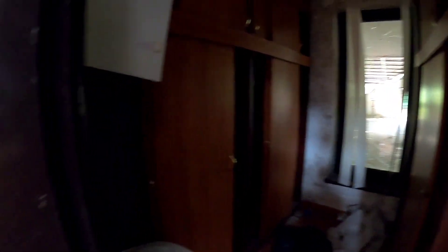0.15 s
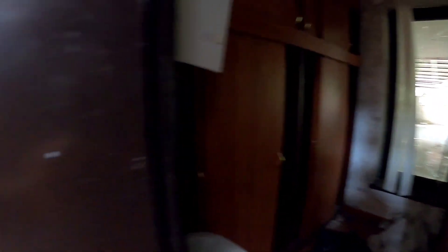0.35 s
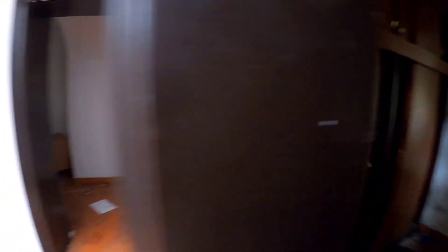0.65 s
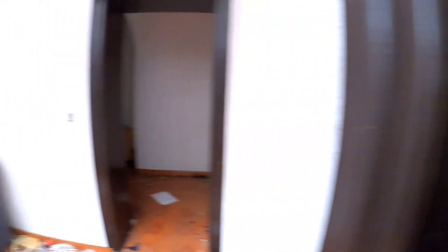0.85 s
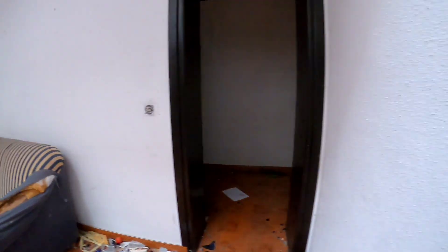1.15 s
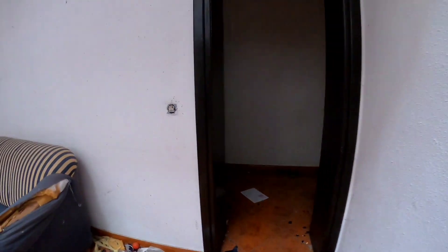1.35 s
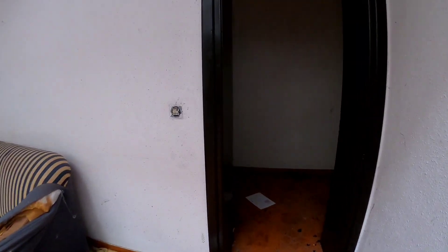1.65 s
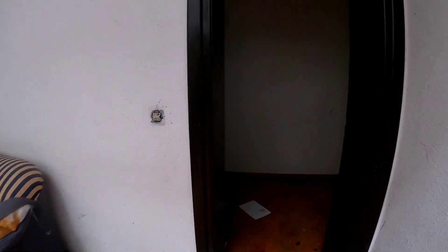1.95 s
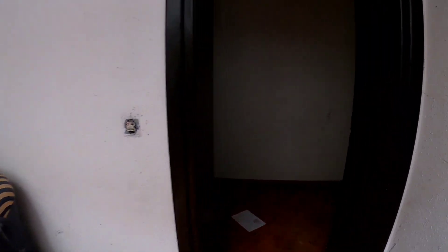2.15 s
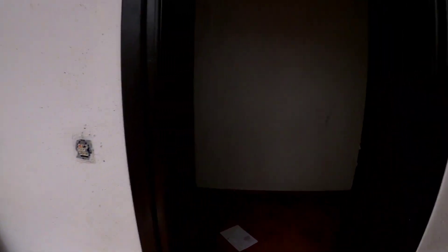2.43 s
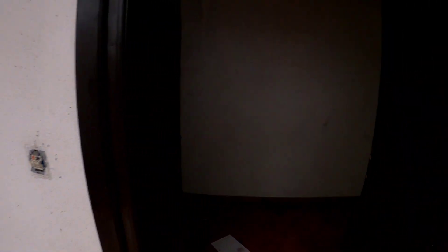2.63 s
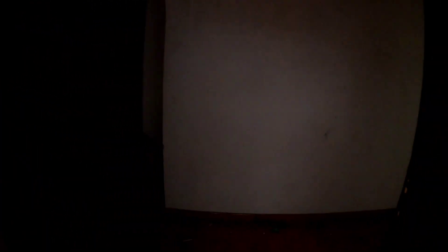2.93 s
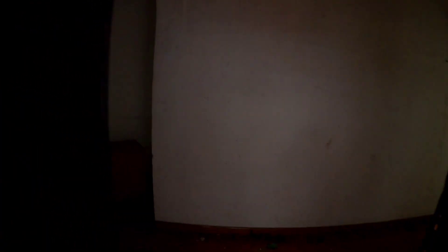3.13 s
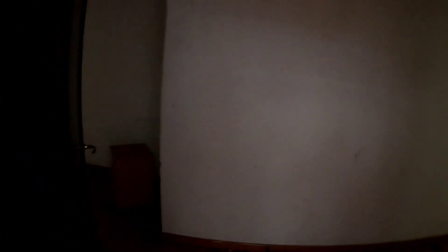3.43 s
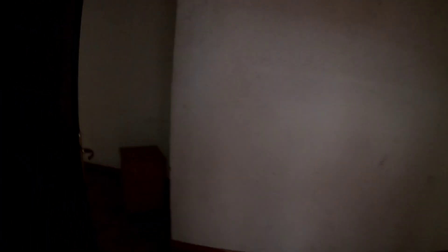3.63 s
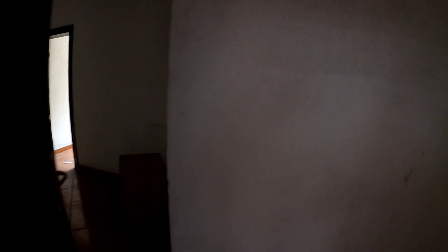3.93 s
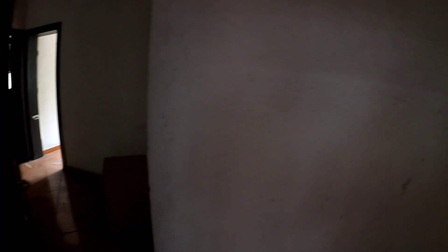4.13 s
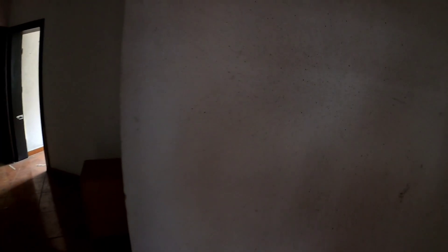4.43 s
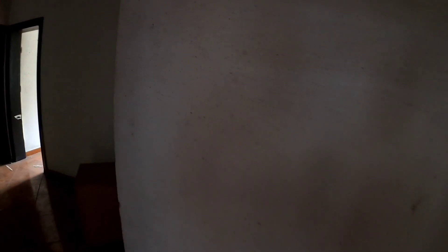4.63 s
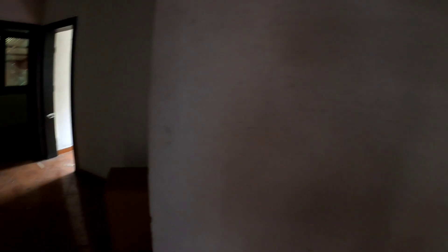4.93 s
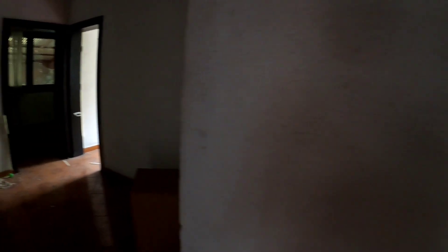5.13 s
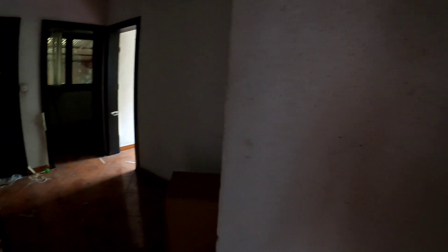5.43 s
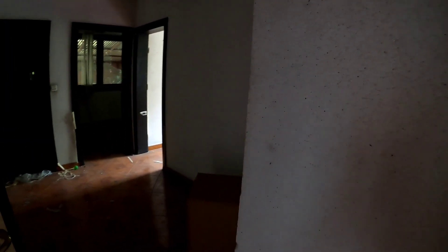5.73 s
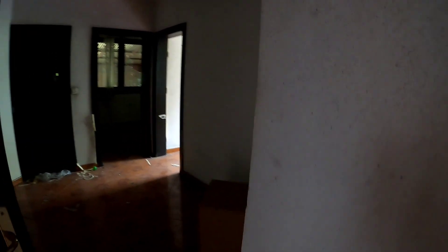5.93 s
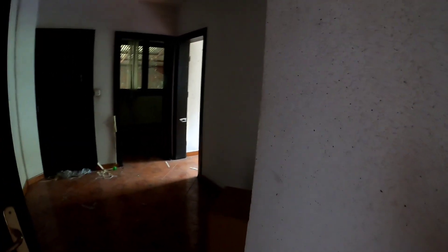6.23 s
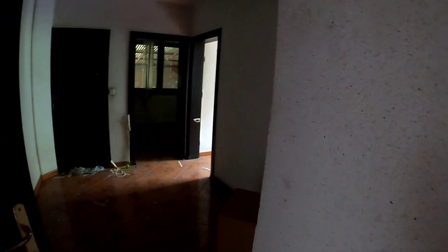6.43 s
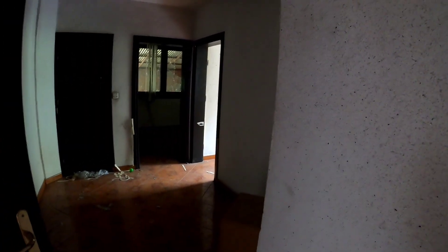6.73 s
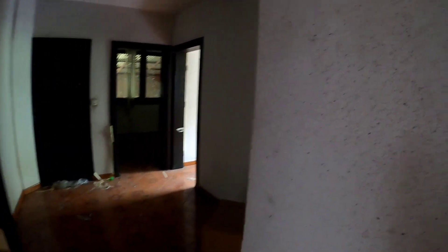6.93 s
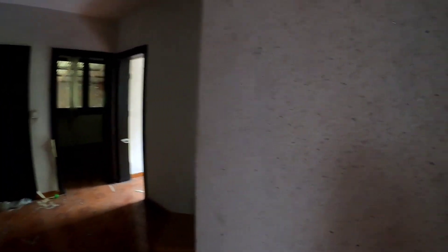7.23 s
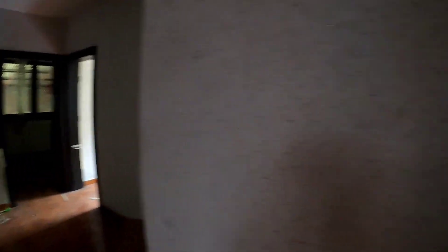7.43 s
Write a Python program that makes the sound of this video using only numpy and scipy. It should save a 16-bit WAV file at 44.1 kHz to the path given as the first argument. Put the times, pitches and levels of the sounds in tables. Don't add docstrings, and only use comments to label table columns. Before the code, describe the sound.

Slow, uneven steps over debris in a bare flat, heard from a close hand-held stereo microphone. At 0.1-0.2 s a sole drags and crushes grit and a loose tile clacks rapidly. Faint ticks follow at 0.4-0.6 s, then low bumps of air around 0.7-1.1 s. A sharp cluster of cracks and crunches lands at 1.15 s. A muffled heel thuds at 2.1 s amid soft scuffing and small pops. At 2.9-3.0 s a firm step, a bright glass chip ring and a rattle of clacks. The loudest hard clack bursts at 3.8 s, with more clatter at 4.0-4.15 s and cracks at 4.35-4.5 s. Lighter snaps come at 4.86, 5.03, 5.85-6.0 and 6.4 s, then a quieter gap. Scuffs and brittle cracks return at 7.1-7.55 s. Each impact leaves a half-second room tail over faint distant town hum and hiss.

```python
import sys
import numpy as np
from scipy import signal
from scipy.fft import rfft, irfft
from scipy.io import wavfile
from scipy.ndimage import map_coordinates

SR = 44100
rng = np.random.default_rng(int(sys.argv[2]) if len(sys.argv) > 2 else 0)


def to_linear_factor(level_db):
    exponent = np.asarray(level_db, float) / 20
    return 10 ** exponent


def to_wav(sig):
    pcm = np.clip(np.atleast_2d(sig), -1, 1) * 32767
    pcm = np.round(pcm).astype(np.int16)
    wavfile.write(sys.argv[1], SR, pcm.T)


N = 334278
HZ = np.arange(N // 2 + 1) * SR / N + 1e-3

# f/Hz, level per Hz/dB
HUM_SPECTRUM = [(70, -20), (100, -30.5), (125, -16.5), (160, 0), (260, -2.5), (400, -5), (800, -8.5),
                (1500, -4.5), (2300, -9.5), (4000, -11.5), (6300, -14), (8300, -19), (10000, -27),
                (14000, -33), (15800, -52.5)]
# f/Hz, likeness/0-1
LIKENESS = [(60, .9), (350, .96), (700, .76), (1500, .6), (3000, .42), (6000, .2), (12000, 0)]
# f/Hz, level/dB
LEAN = [(100, .3), (500, .8), (1400, 2.2), (3000, 2.6), (6000, .6), (10000, -1), (14000, -3.5)]
# f/Hz, level/dB
MIC = [(2000, 0.5), (5000, 0), (8000, -1.5), (12000, -14), (15500, -17.5)]
# t/s, held/s, level/dB
GUSTS = [(0, 0.033, -55), (.665, 0.01, -54), (.77, .02, -49), (.86, 0.019, -52), (.93, .02, -47.5),
         (1.01, 0.027, -46.5), (1.06, .01, -58), (1.16, 0.11, -60), (2.27, 0.022, -58), (2.49, .03, -58.5),
         (2.91, 0.087, -55), (3.31, 0.025, -59), (3.57, 0.22, -56), (4.05, .03, -65), (4.35, 0.018, -65),
         (4.62, 0.32, -63.5), (4.96, 0.028, -63), (5.24, 0.029, -68), (5.85, .02, -64), (6.08, 0.14, -63.5),
         (6.67, 0.051, -65), (7.3, .04, -53.5), (7.4, 0.11, -60)]
# f/Hz, time to fade 60 dB/s, level/dB
ROOM = [(127, 0.52, -3), (386, 0.41, 2), (925, 0.49, -1.5), (2766, 0.38, -3), (6720, 0.3, -1.5),
        (13900, .4, -25)]
STRETCHES = (1, 1.037, .966)
# left delay/s, right delay/s, level/dB
ECHOES = [(.0024, .00247, -10), (.0053, .00518, -5.5)]
# t/s, share reaching the walls/dB, town hum level/dB
PLACE = [
    (0, 0.5, -7),
    (.7, -11, 1),
    (1.2, 1.5, -2.5),
    (3, 0, 6.5),
    (5, 3, -1),
    (6.3, 1.5, 2),
    (6.8, 4, -5.5),
    (7.58, -2, 5.5),
]
# full pressure reached t/s, held/s, level/dB
DRAGS = [(.1, 0.097, -36.5), (.42, 0.24, -55), (1.25, 0.037, -38.5), (1.37, 0.039, -48.5), (1.75, 0.2, -64),
         (2.15, .72, -51.5), (3.03, 0.01, -32.5), (3.08, 0.07, -45.5), (3.2, 0.18, -55.5),
         (3.57, 0.011, -49.5), (3.76, 0.24, -39.5), (4.18, 0.31, -41.5), (4.62, 0.5, -55),
         (5.07, 0.029, -41), (5.9, 0.026, -41.5), (6.28, 0.18, -51.5), (7.18, 0.049, -50.5),
         (7.39, 0.22, -40)]
# t/s, peak level/dB
TICKS = [(6.24, -52), (0.4678, -55), (1.3794, -69), (1.4955, -61), (2.0762, -41.5), (2.459, -63),
         (2.4663, -54), (2.5546, -44), (2.5994, -56), (2.6818, -54), (2.705, -42.5), (2.7945, -49),
         (2.8642, -54.5), (3.108, -43.5), (3.197, -51), (3.2058, -59), (3.7121, -43.5), (3.9075, -51.5),
         (4.2852, -54), (4.4627, -57), (4.9688, -49), (5.0273, -43), (5.0314, -44.5), (5.8497, -40),
         (5.9316, -41), (6.3945, -48), (6.325, -57), (7.1256, -34), (7.375, -31), (7.39, -43.5),
         (7.566, -45)]
# start t/s, end t/s, centre f/Hz, width/share of centre, level/dB
SWISHES = [(3.05, 3.135, 3150, 0.22, -49), (4.701, 4.725, 3100, 0.8, -53), (5.169, 5.197, 3700, 0.81, -50),
           (7.1, 7.18, 7300, 0.79, -43), (3.77, 3.819, 3400, 0.17, -37), (.52, .55, 5000, 0.31, -52),
           (.512, .546, 1000, 0.41, -55.5), (.548, .59, 1450, 0.18, -64.5), (0.17, .27, 5300, 0.12, -45),
           (.19, 0.27, 2300, .13, -43), (4.12, 4.18, 7200, 0.11, -62), (4.14, 4.25, 2600, 0.52, -44),
           (3.696, 3.73, 6500, .6, -45), (4.73, 4.82, 200, .35, -56.5), (4.78, 4.85, 1300, 0.61, -54.5),
           (1.14, 1.2, 560, 0.27, -50), (6.396, 6.46, 3300, 0.42, -60), (7.47, 7.56, 11500, .3, -50.5),
           (7.475, 7.53, 4600, 0.37, -49.5), (2.7, 2.728, 4100, 0.13, -58),
           (7.345, 7.42, 1100, 0.41, -54.5), (5.04, 5.1, 1500, .2, -54)]
# start t/s, end t/s, ring from f/Hz, ring to f/Hz, level/dB
SCRAPES = [(0.032, 0.192, 3890, 4200, -62), (0.04, 0.143, 2300, 2450, -55), (0.085, 0.177, 5170, 5400, -56),
           (0.086, 0.15, 3950, 4330, -48), (.14, 0.201, 2600, 2300, -37), (2.523, 2.591, 1500, 1388, -59),
           (0.518, 0.545, 2017, 2500, -54.5), (1.14, 1.188, 546, 548, -50), (2.95, 3.05, 10500, 12000, -58),
           (2.95, 3.05, 13500, 13400, -48.5), (2.99, 3.04, 564, 563, -50.5),
           (7.288, 7.372, 2700, 3250, -54.5), (7.289, 7.345, 1950, 2150, -52.5),
           (7.287, 7.325, 610, 640, -58.5)]
# f/Hz, level/dB, time to fade 60 dB/s
CHIP_RINGS = [(10510, 7, 0.0064), (13530, -5.5, 0.0075), (3840, -8, 0.004), (9300, -28.5, .008)]
# f/Hz, level/dB, time to fade 60 dB/s
TILE_RINGS = [(2600, -0.5, 0.0061), (4200, 1.5, 0.0043), (5330, -10.5, 0.0047), (3300, -9.5, 0.0097)]
# t/s, peak level/dB, upper rings level/dB, lowest ring raised by/ratio
TILE_HITS = [
    (0.14, -2.5, -4.5, 1.015),
    (0.1752, -6.5, 2, 0.83),
    (0.1784, -2, -5, 1.163),
    (.183, -9.5, -0.5, 0.86),
]
# t/s, peak level/dB, main f/Hz, second f/Hz, second minus main/dB
CLACKS = [(2.9895, -21, 3060, 1500, -7), (2.9977, -18, 3150, 1500, -8), (3.0048, -20.5, 2960, 1530, 1),
          (3.0108, -22.5, 3150, 1870, 1), (3.0205, -22, 3220, 1390, 2), (3.0255, -19.5, 3300, 1600, 0),
          (3.0315, -24, 3100, 1200, 4), (3.7902, -8, 3360, 4250, -7), (3.7952, -7, 3350, 4200, -12.5),
          (3.7903, -25, 7000, 8800, -3), (3.7953, -24, 7000, 8500, -4), (3.9928, -26, 3720, 1900, -9),
          (3.9968, -26, 4370, 5600, -11), (4.0015, -23, 4200, 2020, -13), (4.0058, -22, 4340, 5560, -9),
          (4.0112, -33, 4000, 5000, -7), (4.018, -36, 3400, 5200, -7), (4.1128, -18, 3440, 9300, 1),
          (4.1183, -10.5, 1820, 3300, 0.5), (4.1226, -13, 2660, 1420, -2.5),
          (4.1278, -16, 2600, 1470, -3.5), (4.1355, -27, 2500, 1300, -4), (4.1425, -18, 2720, 1170, -2),
          (4.8605, -20, 5200, 1420, -2), (4.8628, -22.5, 3530, 1930, -4), (4.865, -27, 4530, 1170, 5.5)]
# t/s, peak level/dB, main f/Hz, second f/Hz, second minus main/dB
KNOCKS = [(3.774, -29, 1080, 3000, -5), (3.781, -21, 1090, 3660, 1), (3.786, -24, 1200, 3400, -1),
          (3.799, -22.5, 1042, 806, -5), (4.59, -34.5, 566, 1540, 2), (6.3932, -22, 1940, 1014, -9),
          (6.3934, -31, 8900, 4100, 0), (6.4605, -27.5, 1210, 2190, -2), (0.186, -34, 420, 650, -1),
          (0.179, -26, 1100, 2000, -7), (3.7, -42.5, 670, 900, -10), (8.8, -29.5, 1010, 2130, -1),
          (2.723, -48, 450, 860, -5), (2.1255, -40, 600, 800, -6), (6.398, -30, 1450, 2500, -3)]
# t/s, peak level/dB, main f/Hz, second f/Hz, second minus main/dB
CRACKS = [(0.4142, -43, 4000, 5170, -2), (0.5353, -33, 1047, 5800, 1), (0.5775, -41, 4280, 3200, -4),
          (1.1355, -22, 1490, 6500, -1), (1.1468, -12.5, 1400, 6150, -1), (1.1538, -16, 1800, 3000, -1),
          (1.1572, -10.5, 2000, 6600, 4.5), (1.1622, -19, 1400, 3770, -1), (1.1698, -19.5, 1710, 2900, -2),
          (3.745, -32, 4300, 6500, -6), (5.0271, -21, 1550, 4500, 1), (5.0292, -15, 2300, 5000, 2),
          (5.0313, -18.5, 2600, 7600, 1), (5.0408, -23, 4500, 8000, 1), (5.8489, -20, 2800, 4840, 2),
          (5.8505, -24.5, 2500, 4430, 0), (5.857, -29, 2500, 4600, 1), (5.9308, -21, 2600, 4800, 4),
          (5.9394, -28, 2100, 3300, -4), (6.0162, -28, 1800, 3220, 5), (6.0176, -28, 1800, 2990, 1),
          (6.0203, -25.5, 1900, 2980, -3), (7.3755, -24.5, 2090, 6000, 1), (7.3773, -21, 2270, 8970, 0.5),
          (7.4478, -23, 2200, 5500, -4), (7.4697, -16.5, 1490, 3770, 0), (7.4716, -17.5, 1900, 3600, -1),
          (7.564, -26, 2110, 1290, -5.5), (0.0838, -32, 2400, 1188, -3.5), (4.346, -22.5, 1300, 2410, 0),
          (4.3497, -21, 1200, 2300, 2), (4.362, -27, 1610, 3000, 2), (4.3945, -28, 4000, 900, -6),
          (4.463, -21.5, 2600, 4500, -3), (4.4667, -19, 3200, 5750, -1), (4.4885, -23, 3200, 5500, 0),
          (7.2885, -35, 2200, 2900, -9), (1.1175, -41, 1200, 7500, -2)]
# t/s, peak level/dB, lower f/Hz, upper f/Hz, upper ring minus peak/dB
CRUSHES = [(0.085, -30.5, 2450, 4200, -3.5), (.186, -17, 2270, 3570, -10.5),
           (0.208, -29, 2292, 5000, -19.5), (0.521, -42.5, 970, 5330, -9), (1.118, -33, 933, 6620, -16),
           (1.125, -30, 1590, 2920, -9), (1.139, -22, 1310, 2900, -9), (1.153, -21.5, 1770, 3100, -41),
           (1.17, -22.5, 2680, 3340, -3.5), (2.932, -33, 1090, 3730, -11), (3.708, -28.5, 1290, 4600, 4),
           (3.741, -29, 1170, 4690, -6.5), (7.104, -40, 1260, 6300, -6.5), (7.12, -32, 2600, 7500, -8.5),
           (7.438, -30, 2150, 4600, -8)]
# t/s, peak level/dB, lower f/Hz, upper f/Hz
SPLINTERS = [(0.423, -44, 2820, 4100), (0.469, -39, 1250, 3160), (0.537, -37, 1080, 5800),
             (0.576, -50, 1360, 4290), (1.138, -33, 1390, 5020), (1.1417, -18, 2010, 5900),
             (1.405, -37, 1630, 2960), (1.496, -42, 2160, 6450), (1.792, -46, 1550, 4350),
             (2.078, -39.5, 2230, 5100), (2.444, -41.5, 2760, 3360), (3.036, -25, 1300, 3100),
             (3.197, -37.5, 1070, 3120), (3.802, -26, 2900, 3760), (4.003, -22.5, 1990, 4200),
             (4.113, -23.5, 1190, 7300), (4.124, -21, 2600, 7200), (4.473, -32, 3000, 5070),
             (4.485, -30, 2600, 3420), (4.861, -22.5, 1580, 5540), (5.032, -20.5, 1880, 4500),
             (5.851, -25, 2600, 4200), (5.933, -25.5, 2300, 4600), (6.021, -29, 1820, 2900),
             (6.206, -34, 2500, 3500), (6.236, -38.5, 1890, 4650), (7.472, -18, 1460, 3820)]
# t/s, peak level/dB, lower f/Hz, upper ring minus peak/dB
LUMPS = [(1.174, -20.5, 1900, -19), (2.36, -34, 1760, -15), (2.532, -36.5, 1330, -17),
         (2.556, -36, 1440, -21), (2.672, -42, 2660, -12), (2.707, -32.5, 2550, -13),
         (2.841, -38, 1570, -15), (2.861, -35, 1550, -18), (2.983, -30, 2870, -17), (3.014, -29, 1190, -15),
         (3.042, -32.5, 1500, -9), (3.1, -31, 2000, -10.5), (3.773, -19, 1110, -16.5),
         (3.806, -28, 1900, -10), (3.983, -39, 1200, -8), (4.287, -27.5, 2600, -13), (4.352, -22, 1500, -2),
         (4.591, -31, 1330, -16), (4.827, -34, 1360, -29), (4.966, -33, 1440, -10.5),
         (5.757, -40.5, 2130, -19), (5.812, -37.5, 1540, -24), (5.981, -39, 2610, -9.5),
         (6.118, -36, 2180, -23), (6.259, -36, 1420, -5), (6.399, -25.5, 1690, -16),
         (6.466, -29.5, 1500, -22), (7.374, -30, 2050, -18), (7.387, -32, 2000, -10),
         (7.563, -31, 2030, -2)]
# t/s, peak level/dB, f/Hz
SLAB = [
    (0.095, -36, 152.4),
    (2.24, -49, 70.5),
    (2.917, -37.5, 110),
    (2.991, -44, 63.2),
    (2.909, -36, 151),
    (7.11, -51, 110),
    (7.284, -56, 67),
]
# t/s, peak level/dB, strongest floor ring f/Hz, contact time/s
HEELS = [(0.086, -34, 180, 0.0011), (0.119, -34, 161, 0.0024), (0.18, -35.5, 240, 0.0019),
         (1.135, -35, 490, 0.0025), (1.147, -36, 383, 0.0021), (2.1254, -24.5, 235, 0.0016),
         (2.716, -52, 423, 0.0027), (2.911, -27, 400, 0.0012), (2.9155, -21, 230, 0.0022),
         (3.697, -23, 213, 0.0014), (4.114, -37.5, 222, 0.00056), (4.346, -39, 480, 0.00061),
         (4.682, -28.5, 230, 0.00059), (5.837, -32.5, 174, 0.0022), (2.155, -26.5, 215, 0.002),
         (7.039, -43, 318, 0.0026), (7.104, -36, 270, 0.002), (7.282, -37, 160, 0.0048)]
# f/Hz, level/dB, time to fade 60 dB/s
FLOOR_RINGS = [(63.4, -21.5, 0.16), (155, -6.5, 0.93), (258.3, 10.5, 0.053), (307, -19.5, 0.12),
               (493, 0, 0.085), (694, -31, 0.047)]


def along(table, column=1):
    table = np.array(table, float)
    return np.interp(np.log(HZ), np.log(table[:, 0]), table[:, column])


def unit(x):
    return x / np.sqrt(np.mean(x ** 2))


def ring(x, hz, t60):
    pole = np.exp(2j * np.pi * min(hz, .45 * SR) / SR - np.log(1000) / (t60 * SR))
    return signal.lfilter([1], [1, -pole], x).imag


def band(x, low_hz, high_hz):
    return signal.sosfilt(signal.butter(2, [low_hz, high_hz], "bandpass", fs=SR, output="sos"), x)


def grains(shape, rate, spread_db):
    hit = rng.random(shape) < rate / SR
    return hit * rng.choice([-1., 1.], shape) * to_linear_factor(spread_db * rng.exponential(size=shape))


def pair(shape):
    mid, side = (rfft(rng.standard_normal(N) * shape) for _ in range(2))
    like = np.clip(along(LIKENESS), 0, 1)
    return np.sqrt(1 + like) * mid + np.sqrt(1 - like) * side * np.array([[1], [-1]])


def add(out, s, sound, db):
    i = int(s * SR)
    out[i:i + len(sound)] += (sound * to_linear_factor(db) / np.abs(sound).max())[:len(out) - i]


def swells(rows, rise_db_s, fall_db_s, rest_db):
    t = np.arange(0, N + 64, 64) / SR
    power = to_linear_factor(2 * rest_db)
    for s, held, db in rows:
        early = np.maximum(s - t, 0)
        late = np.maximum(t - s - held, 0)
        power = power + to_linear_factor(2 * (db - rise_db_s * early - fall_db_s * late))
    return np.interp(np.arange(N) / SR, t, 10 * np.log10(power))


def hum():
    return to_linear_factor(-61) * unit(irfft(to_linear_factor(along(HUM_SPECTRUM)) * (HZ > 60) * pair(1), N))


def air(air_db, boom_db):
    noise, side_sign = rng.standard_normal((2, 3, N)), np.array([[1], [-1]])
    wind, boom = [], []
    for gust, low, high in noise:
        wind.append(unit(band(band(band(gust, 11.3, 47), 11.3, 47), 8, 80)))
        low = unit(band(band(low, 130.4, 202), 134, 206))
        high = unit(band(band(high, 230, 385), 230, 385))
        boom.append(low + to_linear_factor(-2.0) * high)
    wind = wind[0] + 0.6 * wind[1] * side_sign
    boom = boom[0] + 0.4 * boom[1] * side_sign
    return to_linear_factor(air_db) * wind + to_linear_factor(boom_db + 2.0) * boom


def room(dry):
    t, tail = np.arange(N) / SR, 0
    for k, (hz, t60, db) in enumerate(ROOM):
        share = along([(f, j == k) for j, (f, _, _) in enumerate(ROOM)])
        fade = np.exp(-np.log(1000) * t / t60) * (1 - np.exp(-t / 0.00043)) * (t < 1.5)
        tail = tail + to_linear_factor(db) * np.sqrt(share) * pair(fade / np.sqrt(np.sum(fade ** 2)))
    tail = irfft(tail, N)[:, :3 * SR // 2]
    lag, turn = np.arange(SR), (t // .071) % len(STRETCHES)
    out = 0
    for k, stretch in enumerate(STRETCHES):
        path = np.array([map_coordinates(side, [lag * stretch]) for side in tail])
        out = out + signal.fftconvolve((dry * (turn == k))[None], path, axes=1)[:, :N]
    return out


def echoes(wet):
    out = 0
    for *lags, db in ECHOES:
        out = out + to_linear_factor(db) * np.array([np.roll(wet, int(lag * SR)) for lag in lags])
    return out


def scuff(drag_db):
    grit = grains(N, 1500, 2.2) + .6 * rng.standard_normal(N)
    pops = np.clip(grains(N, 110, 3), -3, 3)
    coarse = unit(band(grit, 1046, 4410))
    fine = to_linear_factor(-7.5) * unit(band(grit, 3100, 12800))
    pops = to_linear_factor(-8.5) * unit(band(pops, 1300, 6800))
    return to_linear_factor(drag_db - 9.5) * (coarse + fine + pops)


def ticks():
    out, t = np.zeros(N), np.arange(SR // 40) / SR
    for (s, db), noise in zip(TICKS, rng.standard_normal((len(TICKS), len(t)))):
        add(out, s, band(noise * np.exp(-t / 0.0013), 7420, 13670), db + 11)
    return out


def scrapes():
    out, grit = np.zeros(N), grains(N, 2500, 2.2)
    slides = []
    for start, end, from_hz, to_hz, db in SCRAPES:
        slides.append((start, end, from_hz, to_hz, 4.9 * np.sqrt(from_hz), db, True))
    for start, end, hz, share, db in SWISHES:
        slides.append((start, end, hz, hz, share * hz, db, False))
    for k, (start, end, from_hz, to_hz, width_hz, db, shard) in enumerate(slides):
        u = np.linspace(0, 1, int((end - start) * SR))
        slips = grit[k * SR // 5:][:len(u)] + 5 * shard * (u == 0)
        rough = band(band(slips, 5.9, width_hz), 13, 0.94 * width_hz)
        tone = np.sin(2 * np.pi * np.cumsum(from_hz + (to_hz - from_hz) * u) / SR)
        rise = 1 if shard else np.clip(u / 0.17, 0, 1)
        add(out, start, rough * tone * rise * np.clip(6 * (1 - u), 0, 1), db + 12)
    return out


def chip():
    lead_s = .018
    out, t = np.zeros(N), np.arange(SR // 8) / SR - lead_s
    rattle = grains(len(t), 1600, 3) * np.exp(-np.abs(t) / np.where(t < 0, .005, .012))
    blow = np.abs(t) < .5 / SR
    force = to_linear_factor(-19.0) * rattle + blow
    rings = sum(to_linear_factor(db) * ring(ring(force, hz, t60), hz, t60 / 3) for hz, db, t60 in CHIP_RINGS)
    add(out, 2.947 - lead_s, rings, -10)
    return out


def loose_tile():
    out, tap = np.zeros(N), np.arange(SR // 20) == 0
    for s, db, upper_db, stiff in TILE_HITS:
        tuned = [(TILE_RINGS[0][0] * stiff, *TILE_RINGS[0][1:]), *TILE_RINGS[1:]]
        modes = [to_linear_factor(d) * unit(ring(ring(tap, hz, t60), hz, t60 / 2)) for hz, d, t60 in tuned]
        add(out, s, band(modes[0] + to_linear_factor(upper_db) * sum(modes[1:]), 1400, 9000), db - 1.5)
    return out


def clacks():
    out, tap = np.zeros(N), np.arange(SR // 30) == 0
    for rows, cycles in ((CLACKS, 8.1), (KNOCKS, 20.8), (CRACKS, 6.1)):
        for s, db, main_hz, second_hz, second_db in rows:
            main, second = (unit(ring(ring(tap, hz, cycles / hz), hz, 0.364 * cycles / hz))
                            for hz in (main_hz, second_hz))
            add(out, s, main - to_linear_factor(second_db) * second, db - 0.5)
    return out


def snaps():
    crush_s, splinter_s, lump_s = 0.019, 0.0039, 0.0052
    out, t = np.zeros(N), np.arange(SR // 8) / SR
    pieces = [(*row, crush_s) for row in CRUSHES]
    pieces += [(*row, -8, splinter_s) for row in SPLINTERS]
    pieces += [(s, db, hz, 3300, upper, lump_s) for s, db, hz, upper in LUMPS]
    breaks = grains((len(pieces), len(t)), 2500, 2.3)
    piece = rng.integers(0, 3, breaks.shape)
    for (s, db, low_hz, high_hz, high_db, crunch), row, which in zip(pieces, breaks, piece):
        force = to_linear_factor(-8.5) * row * np.exp(-t / max(crunch, 3e-4))
        force[0] = to_linear_factor(-3.5 if crunch == crush_s else 0)
        which[0] = 1
        parts = [(force * (which == k), size) for k, size in enumerate((.74, 1, 1.33))]
        low = unit(sum(ring(x, low_hz * size, 7 / low_hz) for x, size in parts))
        high = unit(sum(ring(x, high_hz * size, 10.0 / high_hz) for x, size in parts))
        crack = to_linear_factor(high_db / 2 - 6.0) * unit(band(force, 2700, 16100))
        sound = low - to_linear_factor(high_db + 7.0) * high + crack
        add(out, s, band(band(sound, 0.35 * low_hz, 15700), 0.4 * low_hz, 22000), db - 1.5)
    return out


def slab():
    out, tap = np.zeros(N), np.arange(SR // 2) == 0
    for s, db, hz in SLAB:
        add(out, s, ring(ring(tap, hz, 14 / hz), hz, 9 / hz), db)
    return out


def heels():
    out, t = np.zeros(N), np.arange(SR // 2) / SR
    for (s, db, hz, contact), noise in zip(HEELS, rng.standard_normal((len(HEELS), len(t)))):
        knock = band(band(noise * np.exp(-t / 0.014), 430, 640), 430, 640)
        push, rebound = (np.sin(np.pi * np.clip((t - lag) / max(contact, 5e-4), 0, 1)) ** 2
                         for lag in (0, .009))
        force = push - 0.302 * rebound
        floor = sum(to_linear_factor(d) * ring(force, f, t60) for f, d, t60 in FLOOR_RINGS)
        main = unit(ring(force, hz, 0.036))
        add(out, s, main + to_linear_factor(0.5) * unit(floor) + to_linear_factor(-13.5) * unit(knock), db - 0.5)
    return band(band(out, 105, 4020), 90, 4000)


def scene():
    t, (at, *place) = np.arange(N) / SR, np.transpose(PLACE)
    wet_db, hum_db = (np.interp(t, at, column) for column in place)
    drag_db = swells(DRAGS, rise_db_s=234.5, fall_db_s=125.5, rest_db=-88)
    air_db = swells(GUSTS, rise_db_s=135.5, fall_db_s=129.5, rest_db=-70.5)
    thuds = [(s + 0.01, 0.11, -44.5 + 0.6 * db) for s, db, *_ in HEELS]
    boom_db = swells(thuds, rise_db_s=252, fall_db_s=55, rest_db=-75)

    grit = snaps() + scuff(drag_db)
    fine_db = 0.25 * (-42 - drag_db)
    grit = grit + (to_linear_factor(fine_db) - 1) * band(grit, 3700, 15000)
    steps = grit + ticks() + chip() + scrapes()
    thud = heels() + slab()
    tile, bits = loose_tile(), clacks()

    wet = steps + to_linear_factor(-4) * thud + to_linear_factor(-5.0) * tile + to_linear_factor(-4.5) * bits
    wet = wet * to_linear_factor(wet_db)
    near = steps + thud + tile + bits + echoes(wet) + room(wet)
    return irfft(rfft(near) * to_linear_factor(along(MIC)), N) + air(air_db, boom_db) + to_linear_factor(hum_db) * hum()


def top_cut(x):
    return signal.sosfilt(signal.butter(12, 16150, fs=SR, output="sos"), x)


def record(dry):
    ports = np.array([[.5], [-.5]])
    late = np.exp(-2j * np.pi * np.minimum(HZ, 7000) / SR * 1.1 * ports)
    lean = to_linear_factor(along(LEAN) * ports) * late
    mix = irfft(rfft(dry) * lean * (HZ < 15800), N)
    return top_cut(mix)


dry = scene()
out = record(dry)
to_wav(out)
```